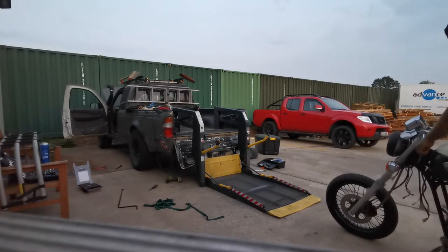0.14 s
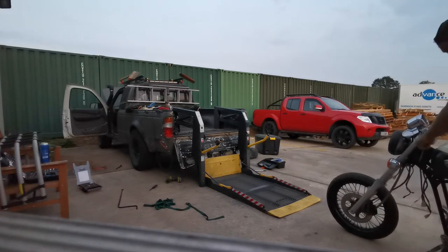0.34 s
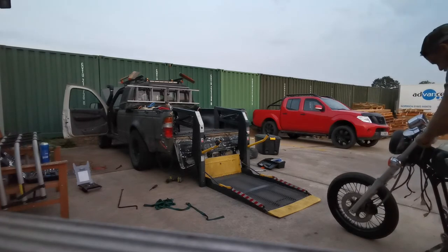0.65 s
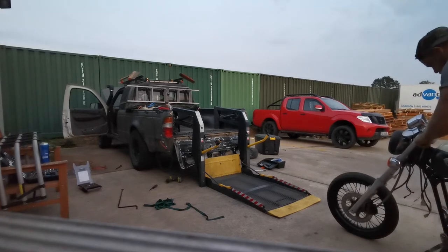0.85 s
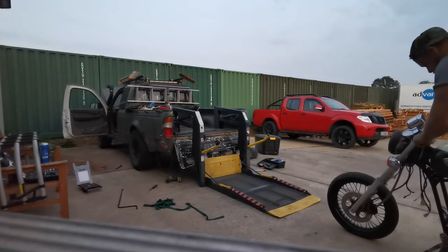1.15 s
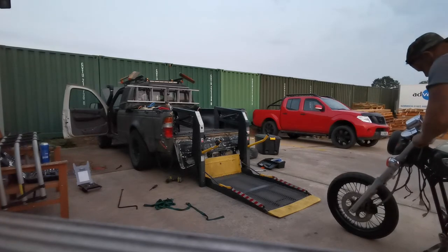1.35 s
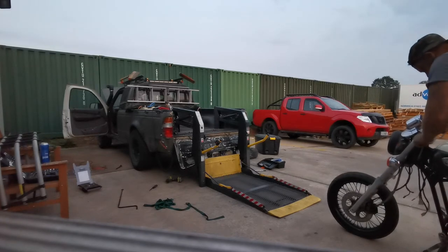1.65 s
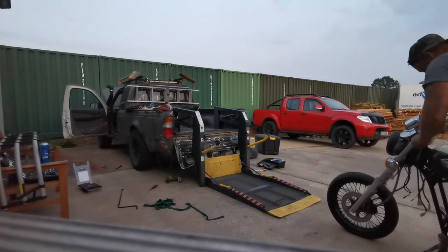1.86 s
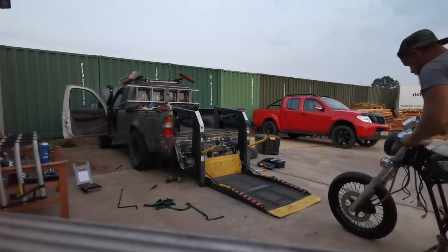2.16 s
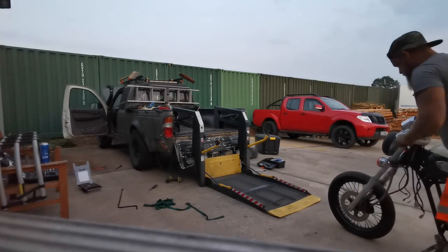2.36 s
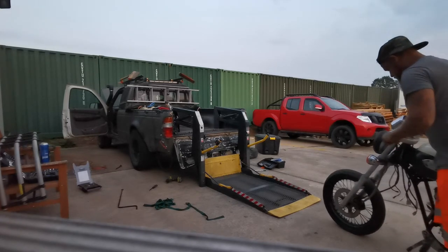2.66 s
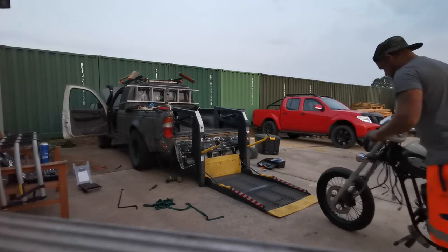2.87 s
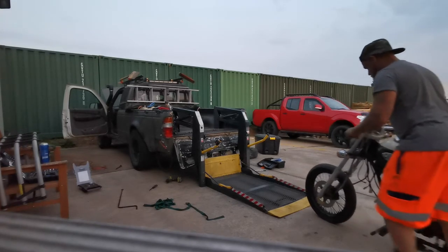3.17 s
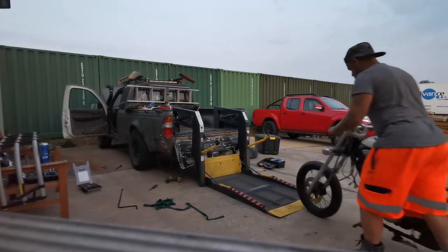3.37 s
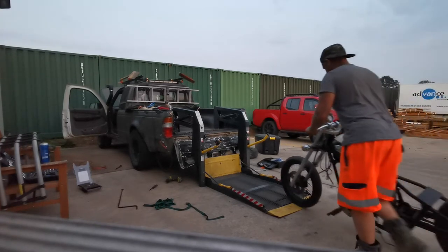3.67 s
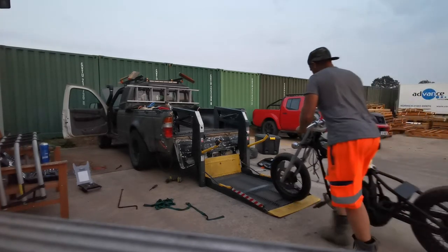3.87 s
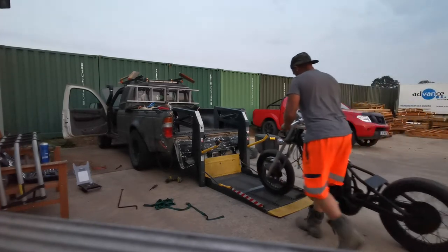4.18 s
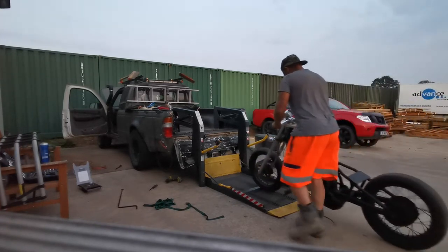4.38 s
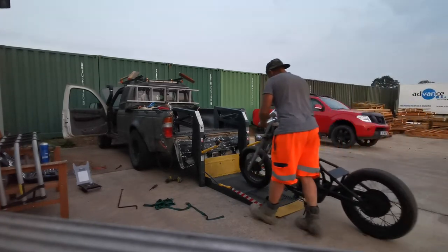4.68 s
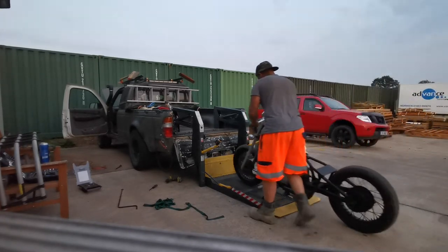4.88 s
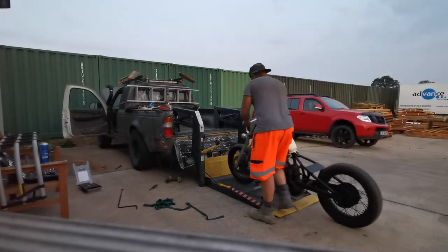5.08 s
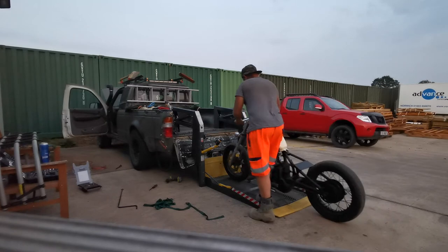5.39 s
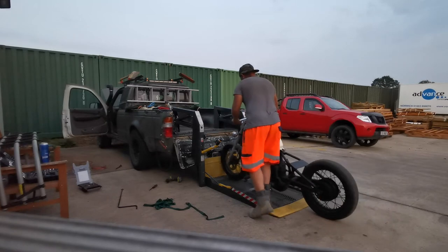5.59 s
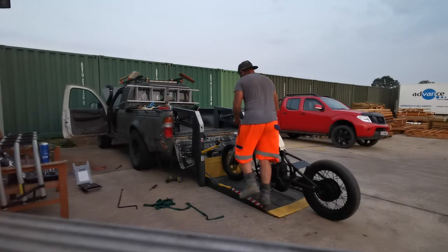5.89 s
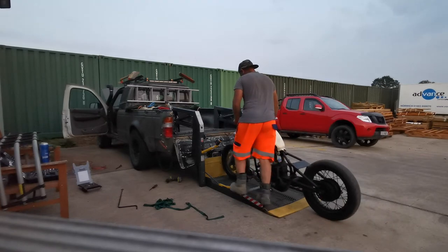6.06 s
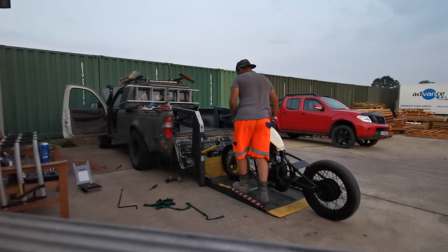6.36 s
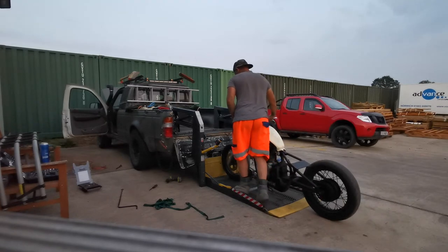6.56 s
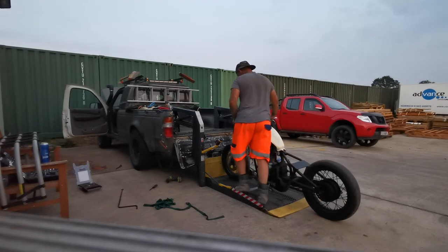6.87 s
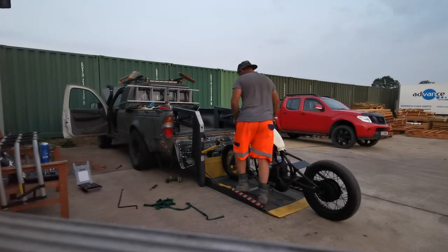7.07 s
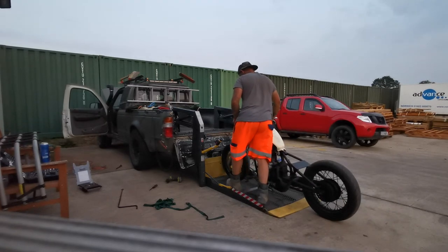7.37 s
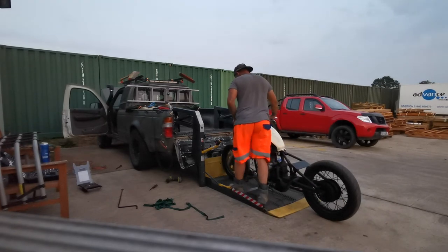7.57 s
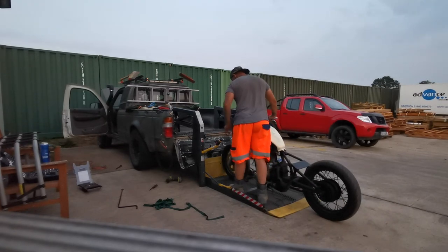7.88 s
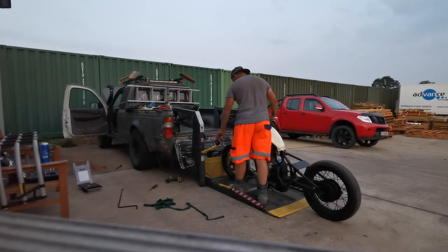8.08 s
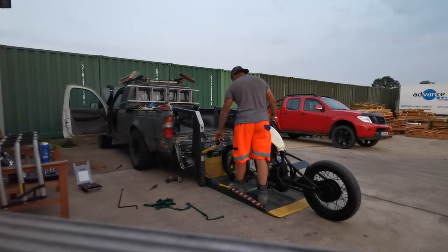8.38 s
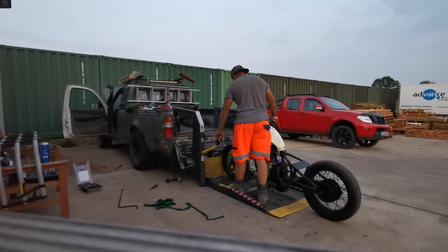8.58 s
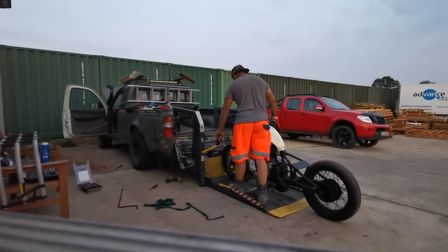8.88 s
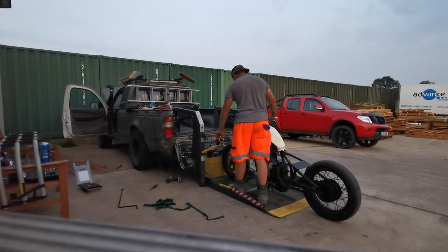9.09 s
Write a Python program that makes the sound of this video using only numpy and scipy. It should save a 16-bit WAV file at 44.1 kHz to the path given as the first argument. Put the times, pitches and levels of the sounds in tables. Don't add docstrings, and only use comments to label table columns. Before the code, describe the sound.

Outdoor concrete yard with faint far traffic. Shoes scrape grit, then a motorcycle stand snaps up with a very loud, bright steel crack that echoes off metal walls. Boots stamp and drag, rubber squeaks, and the wheel rattles and booms onto a steel ramp. Lighter steps and small metallic taps follow. The stereo microphone is close, with the left side muffled and quieter.

```python
import sys
import numpy as np
from scipy import signal
from scipy.fft import rfft, irfft, next_fast_len
from scipy.io import wavfile
from scipy.ndimage import uniform_filter1d

SR = 44100
rng = np.random.default_rng(int(sys.argv[2]) if len(sys.argv) > 2 else 0)


def how_loud(loudness_db):
    steps = np.asarray(loudness_db, float) / 20
    return 10 ** steps


def transcribe(u):
    v = np.clip(np.atleast_2d(u).T, -1, 1)
    q = np.round(v * 32767).astype(np.int16)
    wavfile.write(sys.argv[1], SR, q)


N = 407484

# (frequency [Hz], density [dB per Hz])
WASH = [(12, -47), (32, -21), (42, -7), (58, 1.5), (115, -13.5), (147, -6), (199, -3.5), (290, -10),
        (398, -11.5), (445, -8), (525, -12.5), (966, -10), (1240, -9), (3760, -31), (5690, -32.5),
        (7200, -36.5), (8300, -47), (15000, -69)]
# (time [s], level [dB])
ROAD_DRIFT = [(0.0, 1.26), (1.6, -1), (2.4, 0.6), (4.2, 1.5), (5.2, -0.5), (6.1, -0.5), (7.6, 0.5),
              (8.5, -1), (9.24, -0.6)]
# (frequency [Hz], width [Hz], level [dB])
TYRE_BANDS = [(1190, 100, -9), (1250, 50, -14), (1780, 70, -20), (1840, 450, -11)]
# (start [s], length [s], first pitch [Hz], last pitch [Hz], level [dB])
ENGINES = [(2.751, 1.27, 405.3, 443, -72), (3.65, 1.07, 444, 495, -66.5), (4.55, 0.96, 347.2, 336.3, -72.5),
           (5.85, 2.05, 441, 457.7, -69.5), (7.8, 0.83, 455.6, 423, -71.5), (6.3, 1.6, 177, 169.5, -71.5),
           (7.6, 2.11, 172.1, 219.6, -66.5), (7.6, 1.04, 551.5, 616, -74.5)]
WASH_DB, RUMBLE_DB, RUMBLE_SWING = -62.5, 5.5, 1.4
ENGINE_FADE_DB = -7

# (frequency [Hz], t60 [s])
YARD_T60 = [(200, 1.1), (550, 1.5), (1000, 1.35), (2000, 1.05), (4500, 0.77), (7000, 0.64), (13000, 0.43)]
# (delay [s], level [dB])
WALLS = [(0, 15), (.05, 1.5), (.12, -2), (.2, 1), (.25, -2.5), (.283, -9.5), (.296, 3), (.36, 2), (.7, 0.5)]
# (frequency [Hz], width [Hz], level over the plain echo [dB])
CARRIED = [(425, 25, 4), (772, 20, 3), (966, 25, 2), (1095, 20, 5), (1165, 25, 5), (1393, 25, 3),
           (1920, 56, 2), (2522, 85, 1)]
# (time [s], level [dB], pitch [Hz], length [s])
RETURNS = [(1.79, -38, 2000, .025), (1.79, -40, 1150, 0.021), (1.79, -44, 1390, 0.1), (1.8, -54, 425, .09),
           (1.82, -54, 540, .08), (1.9, -54, 426.5, .09), (1.91, -45, 1210, .05), (1.99, -47, 1115, 0.13),
           (2.035, -45, 1125, 0.05), (2.08, -53, 1135, 0.09), (2.04, -56, 772, 0.07), (2.17, -58, 980, 0.1)]
YARD_DB = -6
FLASH_DB, FRAME_ECHO_DB = -19.5, -5.5

# (frequency [Hz], density [dB per Hz])
GRIT = [(150, -45), (250, -13), (377, -14), (675, -10), (888, -14.5), (1040, -6), (1290, -10.5), (1430, -6),
        (1760, -7), (2280, -4), (2700, -7), (4930, -11), (5750, -10), (7500, -24.5), (8700, -39),
        (13000, -54), (15000, -64)]
# (time [s], level [dB])
ROLL = [(0.0, -100), (0.35, -79.5), (1.7, -75), (2.4, -84), (3.3, -75), (3.6, -67), (4.4, -75), (5.6, -72),
        (6.0, -80.5), (7.85, -78), (8.15, -88), (9.24, -88)]
SHIVER_DB, SHIVER_T60_S = -50.5, 2.6
# (time [s], peak level [dB], fall [s],
# weight [dB per octave under 2 kHz], fineness [dB per octave over 3 kHz])
STAMPS = [(0.867, -37.5, 0.043, 4.5, 2.5), (0.9291, -39, 0.023, 6, -3.5), (1.0104, -50.5, 0.045, 1, -3.5),
          (2.59, -45, 0.011, 4, -9), (3.024, -46, 0.02, -3, 1), (3.8515, -40.5, 0.058, 9.5, -6.5),
          (4.0787, -42, 0.038, -8, 8), (5.1807, -37, 0.041, -6, -23), (5.531, -22.5, 0.042, 4, -3.5),
          (5.6395, -35.5, 0.025, 7, -3), (5.7254, -27.5, 0.021, 4, -3.5), (5.771, -36.5, 0.033, 10, -13),
          (6.5615, -40.5, 0.03, -1, 9.5), (6.9386, -42.5, 0.058, 0.5, -4.5),
          (7.047, -36.5, 0.027, -32, 0.5), (7.133, -42, 0.016, -6, -2), (7.9487, -33.5, 0.03, 0.5, -10.5),
          (8.599, -47, 0.04, 2, -9), (8.7385, -54, .012, -3, 5), (8.748, -42, .014, -5, 14)]
# (time [s], peak level [dB], fall [s],
# weight [dB per octave under 4.7 kHz], fineness [dB per octave over 5.7 kHz])
SLIDES = [(0.553, -56, 0.026, -34, 1), (0.5994, -58, 0.031, -30, 4), (1.672, -45.5, 0.04, 0.5, 2),
          (2.3584, -55, 0.032, -23.5, 13), (4.668, -39, 0.043, -2, 3), (4.7279, -44.5, 0.029, 5.5, 15),
          (6.6305, -45.5, 0.038, 2.5, -1.5), (7.66, -53.5, 0.092, 5, -7.5), (8.36, -55, 0.085, 4, -1.5)]
DRAGS = [(0.18, -51.5, 0.11, -1, -15), (0.2984, -37.5, 0.043, 0.9, -5), (1.6187, -47.5, 0.031, 0, 2),
         (3.365, -32, 0.034, -3.5, -6), (3.671, -27.5, .017, 1, -1.5), (6.9698, -47, 0.079, 5, 3)]
# (time [s], peak level [dB], weight [dB per octave under 4.7 kHz])
STONES = [(0.004, -72, -32), (1.148, -51, 2), (1.448, -54.5, 1.5), (1.548, -58, 5), (2.465, -71.5, -1),
          (2.621, -57.5, -15.5), (2.6686, -65.5, -13.5), (2.738, -51, 0.5), (2.789, -52.5, -1),
          (2.849, -49, 2), (2.924, -47, 0), (2.955, -57, -10), (4.01, -60, -15), (4.545, -68, -10),
          (6.0878, -64.5, -6.5), (6.69, -56, -8), (7.07, -43, -3), (7.164, -47, 2), (7.3206, -60, -6),
          (6.868, -64.5, -20), (6.54, -61, -12.5), (8.593, -62.5, -14), (7.629, -52.5, -7.5),
          (9.139, -66.5, -7), (9.188, -66, -7)]
STAMP_RISE_S = 0.007
SLIDE_RISE, DRAG_RISE = 0.6, 0.97
STONE_RISE_S, STONE_FALL_S, STONE_FINE_DB = 0.011, 0.024, -0.5

# (time [s], level [dB], pitch [Hz], length [s])
SQUEAKS = [(0.308, -50.5, 2180, 0.085), (1.647, -58, 2480, 0.059), (3.676, -50, 1040, 0.056),
           (3.68, -44.5, 1600, 0.029), (3.676, -45.5, 2550, .03), (6.563, -57, 5330, 0.0091),
           (7.038, -46, 2340, 0.05), (7.132, -53, 2250, 0.013), (7.946, -63.5, 7160, 0.014)]
RINGS = [(1.001, -58, 2100, 0.028), (3.375, -53, 2420, 0.063), (3.37, -55, 1493, .06),
         (3.88, -63, 2097, 0.031), (4.702, -54.5, 1430, 0.05), (4.695, -56, 2270, .025),
         (5.191, -48, 1200, 0.085), (5.181, -54, 1880, 0.05), (5.185, -55, 1540, .04),
         (5.295, -58, 2510, 0.042), (5.542, -44.5, 1460, 0.056), (6.938, -57, 1423, 0.055),
         (7.95, -53, 1410, 0.04), (8.755, -67, 5000, 0.03)]
CHEEPS = [
    (7.325, -79, 4990, 0.05),
    (7.67, -75, 4980, 0.09),
    (8.345, -76, 4990, 0.14),
]
SCRAPES = [(3.715, -53, 420, 0.038), (3.86, -57.5, 584, 0.097), (3.875, -52.5, 387, 0.085),
           (3.94, -63.5, 447, .08), (4.08, -54.5, 2470, 0.053), (4.08, -61, 3950, 0.055),
           (5.532, -62, 8800, 0.022), (5.765, -45, 1670, 0.033), (6.562, -70, 10120, 0.014),
           (7.947, -49, 3000, 0.017), (8.748, -70, 10600, 0.016)]
SQUEAK_WIDTH, RING_WIDTH, CHEEP_WIDTH, SCRAPE_WIDTH = 0.19, 0.03, 0.02, 0.3

# (time [s], peak level [dB], pitch [Hz], t60 [s])
THUDS = [(0.927, -30, 220, 0.041), (0.95, -41.5, 246, 0.11), (2.572, -26, 211, 0.029),
         (3.367, -39, 224.3, 0.12), (3.412, -46.5, 250, 0.095), (3.588, -52, 572, 0.24),
         (3.74, -54, 449, 0.43), (3.888, -43, 419, 0.14), (3.925, -45, 446, 0.1),
         (4.075, -39.5, 231, 0.085), (4.729, -51, 676, 0.096), (5.442, -38, 227, 0.18),
         (5.599, -37, 130, 0.12), (5.631, -30, 280, 0.05), (5.661, -29, 283, 0.068),
         (5.672, -35, 168, 0.16), (5.73, -39, 281, 0.23), (5.772, -30, 333, 0.12), (5.768, -38, 470, .08),
         (5.886, -42, 270, 0.15), (5.93, -42, 150, .3), (6.823, -44, 300, 0.069), (6.847, -38, 251, 0.07),
         (6.881, -45, 147, 0.092), (7.047, -38.5, 213, 0.077), (7.132, -45, 224, 0.06),
         (7.2, -50, 430, 0.086), (7.265, -49, 429, 0.087), (7.9, -41, 306, 0.1), (7.953, -44.5, 254, 0.12),
         (7.98, -50, 430, 0.5)]
TAPS = [(6.632, -45, 850, 0.15), (5.5345, -29, 1570, .03), (5.542, -30, 600, .04), (5.5435, -32, 1430, .04),
        (5.556, -35, 1800, .05), (5.578, -39, 2000, .03), (5.639, -44, 3700, 0.025),
        (5.727, -33, 2030, 0.033), (5.731, -39, 3100, 0.025), (5.736, -33, 1600, 0.053),
        (5.774, -39, 1940, 0.052), (5.787, -42, 1810, 0.041), (3.399, -42, 2390, .04),
        (3.414, -42, 2360, .05), (3.452, -46, 1150, .04), (3.452, -49, 450, .05), (4.081, -46, 2470, .06),
        (3.851, -46, 1200, .05), (5.712, -46, 2300, .08), (6.94, -45, 2300, 0.036),
        (7.134, -46, 2360, 0.028), (8.603, -51, 1250, .08), (8.739, -46, 5650, .04),
        (8.74, -47, 2380, 0.034), (8.7505, -47, 5700, .04)]
BOOMS = [
    (1.755, -33, 197, 0.077),
    (5.6385, -24, 84, 0.11),
    (5.68, -36.5, 100.5, 0.28),
    (5.79, -41, 85, .25),
    (5.887, -27, 92, 0.1),
    (5.89, -35, 66.1, 0.9),
]
# (time [s], level [dB])
SHAKE = [(5.175, -60), (5.183, -53.5), (5.229, -53), (5.273, -57.5), (5.405, -49.5), (5.525, -57)]
# (frequency [Hz], width [Hz], level [dB])
RAMP_MODES = [(550, 60, 7), (702, 45, 2.5), (970, 250, 2), (1200, 35, 2), (1440, 45, 5), (1860, 65, 3),
              (2080, 50, 1), (2510, 55, -1), (2860, 55, -3), (3100, 440, -2), (1650, 400, 4),
              (2300, 600, 6)]
RAMP_TOP_HZ = 3640
WANDER, WANDER_DB = 0.006, 1.5

# (time [s], crack level [dB], stand level [dB], stop level [dB])
BLOWS = [
    (1.7548, -2, 1, -25),
    (1.7570, 3, 3, -18),
    (1.7622, 1, -8, 11),
    (1.7688, -8, -8, -14),
    (1.7793, -18, -14, -20),
    (1.791, -22, -14, -12),
    (1.7995, -22, -14, -20),
]
# (frequency [Hz], level [dB], t60 [s])
STAND_MODES = [(419, -3, 0.12), (776, -5, 0.12), (948, -9, .07), (1088, -6, .1), (1185, -3, 0.05),
               (1390, -13, .1), (1465, -6, 0.047), (2441, 1, .045), (3732, 7, 0.041)]
STOP_MODES = [(1996, 10, 0.022), (2070, 0, .04), (2455, -9, .06), (2970, 0.5, 0.03), (3140, -8, .05),
              (4140, -12.5, .05), (4770, 2, .025), (5050, 2, 0.025), (5840, -3, 0.025), (6160, -14, 0.05)]
# (frequency [Hz], density [dB per Hz])
CRACK = [(59, -62), (100, -32.5), (380, -21.5), (820, -4), (1150, -1.5), (1600, -7), (2050, -7.5),
         (2990, -5), (4000, -11), (4940, -3.5), (9260, -31), (10300, -43.5), (15000, -50)]
STAND_DB, LONGEST_S = -28, 0.13
CRACK_DB, CRACK_S = -13.5, 0.0029

# (frequency [Hz], level [dB])
MUFFLE = [(60, -6), (110, -6), (200, -6.5), (370, -7), (690, -9), (1270, -12.5), (2340, -16.5), (4300, -18),
          (7920, -17), (14600, -9)]
STAND_MUFFLE = [(60, -9), (110, -7.5), (200, -5.5), (370, -4.0), (690, -6.5), (1270, -9), (2340, -14.5),
                (4300, -15), (7920, -12.0), (14600, -7)]
ROAD_MUFFLE = [(60, -7.5), (110, -7), (200, -8), (370, -8.5), (690, -9.5), (1270, -12), (2340, -14.5),
               (4300, -11), (7920, -9), (14600, -8)]
ECHO_MUFFLE = [(60, -3.5), (200, -2.5), (370, -2.5), (690, -4.5), (1270, -6), (2340, -12), (4300, -17),
               (7920, -12.5), (14600, -6)]
# (frequency [Hz], likeness [0-1])
NEAR = [(100, 1), (1500, .98), (3000, .95), (6000, 0.8), (12000, 0.5)]
FAR = [(60, 0.95), (500, 0.96), (1500, 0.93), (3000, .9), (6000, 0.6), (12000, .2)]
LAG_S = 8e-5
PORT_HZ, PORT_WIDTH_HZ, PORT_DB = 5080, 600, -9
HISS_DB, EDGE_HZ = -90.5, 15160


def evened(x):
    return x / np.sqrt(np.mean(x ** 2, -1, keepdims=True) + 1e-20)


def read(points, hz):
    f, value = np.transpose(points)
    return np.interp(np.log(hz + 1), np.log(f + 1), value)


def curve(rows, t):
    times, level = np.transpose(rows)
    return np.interp(t, times, level)


def lay(times, sounds):
    mix = np.zeros(N + SR)
    for s, sound in zip(times, sounds):
        mix[max(round(s * SR), 0):][:len(sound)] += sound
    return mix[:N]


def coloured(x, db):
    gain = how_loud(db(np.fft.rfftfreq(x.shape[-1], 1 / SR)))
    return irfft(rfft(x) * gain, x.shape[-1])


def resonate(x, hz, width):
    turn = np.exp(2j * np.pi * np.cumsum(hz * np.ones(len(x))) / SR)
    r = np.exp(-np.pi * width / SR)
    return 2 * (turn * signal.lfilter([1 - r], [1, -r], x / turn + 1e-18)).real


def grains(shape, spread_db):
    return rng.standard_normal(shape) * how_loud(spread_db * np.minimum(rng.exponential(1, shape), 5))


def wander(shape, size, second_size):
    once = uniform_filter1d(rng.standard_normal(shape), size)
    return evened(uniform_filter1d(once, second_size))


def ports(x, likeness, muffle):
    size = next_fast_len(N + 2048, True)
    hz = np.fft.rfftfreq(size, 1 / SR)
    scatter = rng.standard_normal(600) * np.exp(-np.arange(600) / 100.)
    other = rfft(scatter, size)
    other = 1.5 * other / (abs(other) + .5 * np.linalg.norm(scatter))
    same = np.clip(read(likeness, hz), 0, 1)
    loss = how_loud(read(muffle, hz))
    left = loss * (same * np.exp(-2j * np.pi * hz * LAG_S) + np.sqrt(1 - same ** 2) * other)
    both = 2 / (1 + loss * same)
    return irfft(rfft(x, size) * both * np.array([left, np.ones_like(left)]), size)[:, :N]


def road_wash():
    frames, hz = N // 256 + 5, np.fft.rfftfreq(1024, 1 / SR)
    a, b, patches = rng.standard_normal((frames, 513, 3)).T
    patches = evened(uniform_filter1d(uniform_filter1d(patches, 8, 0), 16, 1))
    busy = curve(ROAD_DRIFT, np.arange(frames) * 256 / SR)
    rumble = (RUMBLE_DB + RUMBLE_SWING * busy) * (hz[:, None] < 150)
    z = (a + 1j * b) * how_loud(read(WASH, hz)[:, None] + 1.2 * patches + rumble)
    wash = evened(signal.istft(z, nperseg=1024, noverlap=768)[1][:N])
    for f, width, db in TYRE_BANDS:
        whine = resonate(rng.standard_normal(N), f, width)
        wash = wash + how_loud(db) * evened(resonate(whine, f, 2 * width))
    return wash * how_loud(WASH_DB + curve(ROAD_DRIFT, np.arange(N) / SR))


def engines():
    tones = []
    for s, length, first_hz, last_hz, db in ENGINES:
        along = np.arange(0, length, 1 / SR) / length
        pitch_hz = first_hz + (last_hz - first_hz) * along
        blur = evened(resonate(rng.standard_normal(len(along)), pitch_hz, 5))
        hum = blur + 2 * np.sin(2 * np.pi * np.cumsum(pitch_hz) / SR)
        fade = how_loud(db + ENGINE_FADE_DB * along) * signal.windows.tukey(len(along), .3)
        tones.append(evened(hum) * fade)
    return lay([row[0] for row in ENGINES], tones)


def yard(*sources):
    taps = np.zeros(SR)
    at = np.arange(200, SR - 20, 20) + rng.integers(0, 20, (SR - 201) // 20)
    taps[at] = rng.choice([-1., 1.], at.shape)
    hz, t, z = signal.stft(taps, SR, nperseg=256)
    fade_db = -60 * t / read(YARD_T60, hz)[:, None] + curve(WALLS, t)
    tail = signal.istft(z * how_loud(fade_db), SR, nperseg=256)[1]
    tail = tail / np.linalg.norm(tail)
    return how_loud(YARD_DB) * signal.fftconvolve(np.array(sources), tail[None], axes=1)[:, :N]


def rolling():
    clumps = evened(uniform_filter1d(rng.standard_normal(N), 900))
    fine = coloured(grains(N, 5.4), lambda hz: read(GRIT, hz) - 1.8 * np.log2(3000 / np.clip(hz, 100, 3000)))
    t = np.arange(N) / SR
    since = t - BLOWS[0][0]
    shiver = (since > 0) * how_loud(SHIVER_DB - 60 * abs(since) / SHIVER_T60_S)
    return evened(fine) * (how_loud(curve(ROLL, t)) + shiver) * how_loud(2.5 * clumps)


def scuffs(rows, low_hz, high_hz):
    s, db, rise, fall, weight, fine = np.array(rows).T[:, :, None]
    t = np.arange(12288) / SR
    lumps = wander((len(rows), len(t) // 2 + 1), 50, 50)

    def colour(hz):
        low = weight * np.log2(low_hz / np.clip(hz, 300, low_hz))
        high = fine * np.log2(np.maximum(hz, high_hz) / high_hz)
        return read(GRIT, hz) + low + high + 2.2 * lumps

    grit = evened(coloured(grains((len(rows), len(t)), 2.5), colour))
    stutter = wander(grit.shape, 220, 40)
    rise, fall = np.maximum(rise, .001), np.maximum(fall, .003)
    swell = np.sin(np.pi / 2 * np.minimum(t / rise, 1)) ** 2
    shape = swell * np.exp(-(np.maximum(t - rise, 0) / fall) ** 1.3)
    return lay(s[:, 0] - .004, how_loud(db - 10.0 + 0.73 * stutter) * grit * shape)


def squeaks(rows, share):
    sounds = []
    for s, db, hz, length in rows:
        x = rng.standard_normal(round(length * SR))
        for width in (share * hz, 2 * share * hz, hz):
            x = resonate(x, hz, width)
        sounds.append(how_loud(db) * evened(x) * signal.windows.tukey(len(x), .6))
    return lay([row[0] for row in rows], sounds)


def footwork():
    stamps = [(s, db, STAMP_RISE_S, fall, *tilt) for s, db, fall, *tilt in STAMPS]
    slides = [(s, db, SLIDE_RISE * fall, fall, *tilt) for s, db, fall, *tilt in SLIDES]
    drags = [(s, db, DRAG_RISE * fall, fall, *tilt) for s, db, fall, *tilt in DRAGS]
    stones = [(s, db, STONE_RISE_S, STONE_FALL_S, weight, STONE_FINE_DB) for s, db, weight in STONES]
    grit = scuffs(stamps, low_hz=2000, high_hz=3000)
    grit = grit + scuffs(slides + drags + stones, low_hz=4740, high_hz=5680)
    slips = squeaks(SQUEAKS, SQUEAK_WIDTH) + squeaks(CHEEPS, CHEEP_WIDTH)
    return grit + slips + squeaks(RINGS, RING_WIDTH) + squeaks(SCRAPES, SCRAPE_WIDTH)


def thuds(rows, puff, narrow_db):
    s, db, hz, t60 = np.array(rows).T[:, :, None]
    t = np.arange(8192) / SR
    noise = rng.standard_normal((len(rows), len(t)))
    dull = coloured(noise, lambda f: -narrow_db * abs(np.log2((f + 1) / (1.02 * hz))))
    push = np.sin(2 * np.pi * hz * t) + puff * evened(dull)
    attack = (1 - np.exp(-t * np.minimum(hz, 900))) ** 1.5
    stop = np.clip((.175 - t) / 0.02, 0, 1)
    return lay(s[:, 0], how_loud(db - 3.0 - 60 * t / np.maximum(t60, .01)) * push * attack * stop)


def ramp():
    t = np.arange(SHAKE[0][0], SHAKE[-1][0], 1 / SR)
    jolts = grains(len(t), 2.9)
    shift, turn = wander((2, len(RAMP_MODES), len(t)), 1500, 1500)
    plate = np.zeros(len(t))
    for k, (hz, width, db) in enumerate(RAMP_MODES):
        moving_hz = hz * (1 + WANDER * shift[k])
        ring = resonate(resonate(jolts, moving_hz, 1.3 * width), moving_hz, 1.7 * width)
        plate += how_loud(db + WANDER_DB * turn[k]) * evened(ring)
    plate = coloured(plate, lambda f: -45.0 * np.log2(np.maximum(f / RAMP_TOP_HZ, 1)))
    return lay(t[:1], [how_loud(curve(SHAKE, t)) * evened(plate) * signal.windows.tukey(len(t), .03)])


def flash():
    lead = 256
    pulse = np.roll(coloured(signal.unit_impulse(2048), lambda f: read(CRACK, f)), lead)
    pulse = np.pad(evened(pulse), (0, 8192))
    pulse = pulse + sum(how_loud(db) * resonate(pulse, hz, width) for hz, width, db in CARRIED)
    return lay([BLOWS[1][0] - lead / SR], [how_loud(FLASH_DB) * pulse])


def ringing(modes, t):
    hz, db, t60 = np.array(modes).T[:, :, None]
    start = 2 * np.pi * rng.random((len(BLOWS), len(modes), 1))
    fade = how_loud(db - 60 * t / np.minimum(t60, LONGEST_S))
    return (fade * np.sin(2 * np.pi * hz * t + start)).sum(1)


def stand():
    t = np.arange(SR // 4) / SR
    s, crack_db, stand_db, stop_db = np.array(BLOWS).T[:, :, None]
    ring = how_loud(stand_db) * ringing(STAND_MODES, t) + how_loud(stop_db) * ringing(STOP_MODES, t)
    crack = evened(coloured(rng.standard_normal(ring.shape), lambda f: read(CRACK, f)))
    crack = crack * np.exp(-t / CRACK_S)
    attack = 1 - np.exp(-t / 0.00069)
    return lay(s[:, 0], (how_loud(STAND_DB) * ring + how_loud(CRACK_DB + crack_db) * crack) * attack)


def scene():
    road = road_wash() + engines()
    landings = thuds(THUDS, .55, 12) + thuds(TAPS, .6, 24) + thuds(BOOMS, .3, 12)
    ground = footwork() + landings + ramp()
    clang = stand()
    clang_echo, ground_echo = yard(flash() + how_loud(FRAME_ECHO_DB) * clang, how_loud(-3.5) * ground)
    far = ports(road, FAR, ROAD_MUFFLE)
    far = far + ports(clang_echo + squeaks(RETURNS, RING_WIDTH), FAR, ECHO_MUFFLE)
    near = ports(ground + ground_echo + rolling(), NEAR, MUFFLE) + ports(clang, NEAR, STAND_MUFFLE)
    return far + near


def roll_off(x):
    return signal.sosfilt(signal.butter(12, 15190, fs=SR, output="sos"), x)


def record(dry):
    dry = dry + how_loud(PORT_DB) * np.array([resonate(x, PORT_HZ, PORT_WIDTH_HZ) for x in dry])
    rounded = dry / (1 + dry ** 8) ** (1 / 8)
    rounded = coloured(rounded, lambda f: -80. * (f > EDGE_HZ))
    hiss = how_loud(HISS_DB) * rng.standard_normal(dry.shape)
    return roll_off(rounded + hiss)


dry = scene()
out = record(dry)
transcribe(out)
```